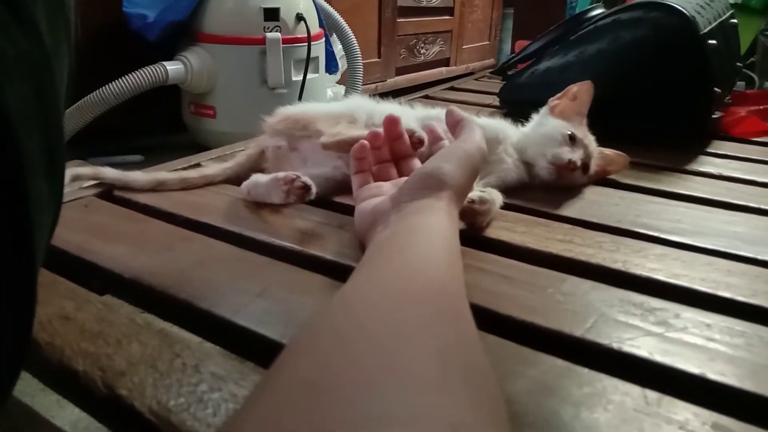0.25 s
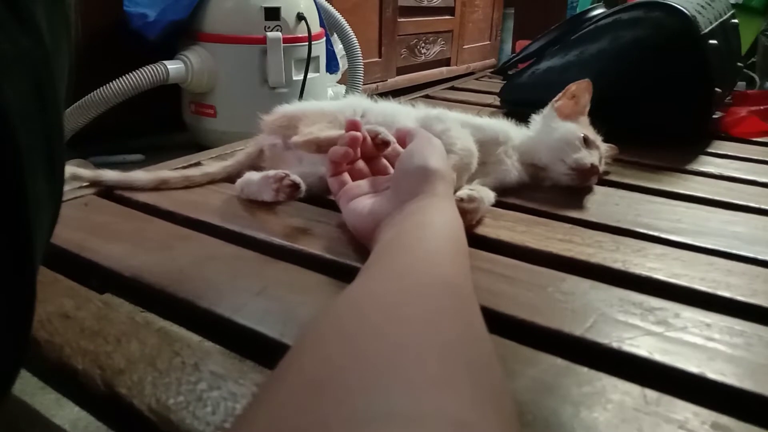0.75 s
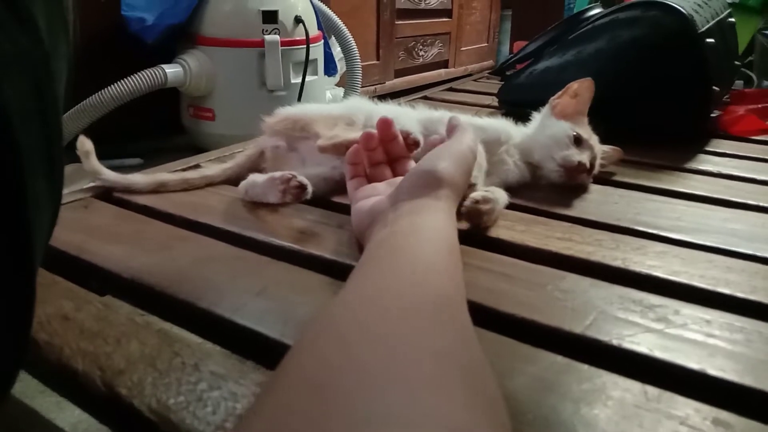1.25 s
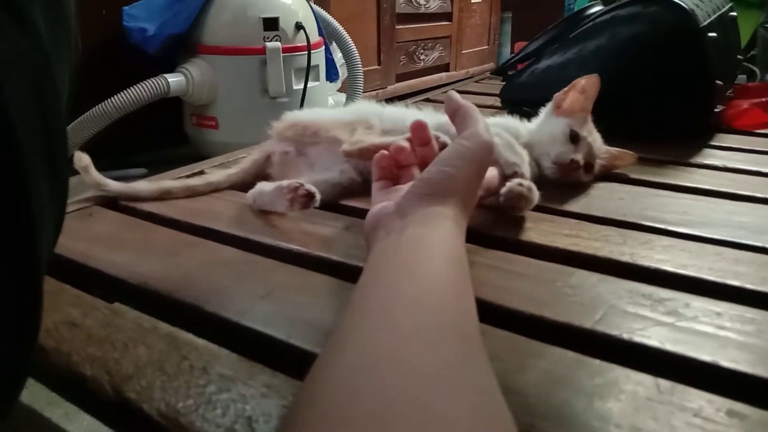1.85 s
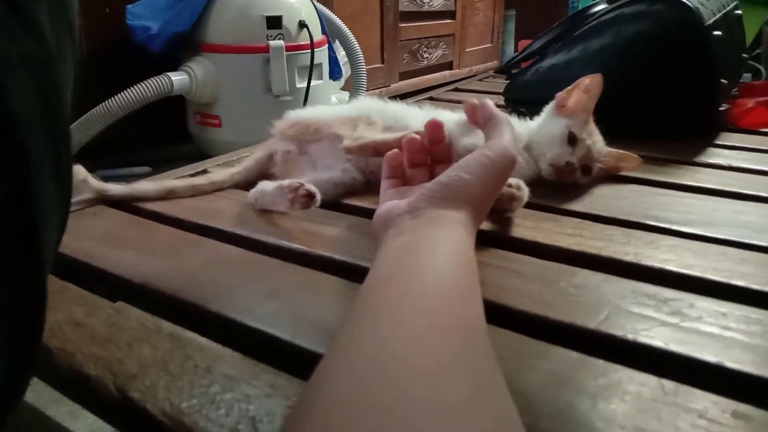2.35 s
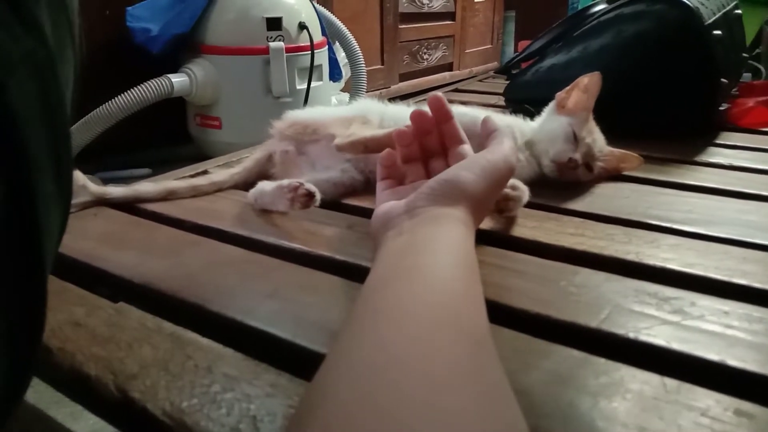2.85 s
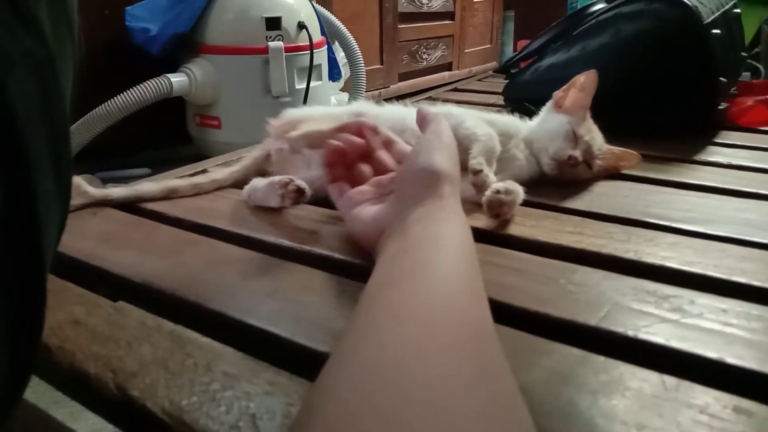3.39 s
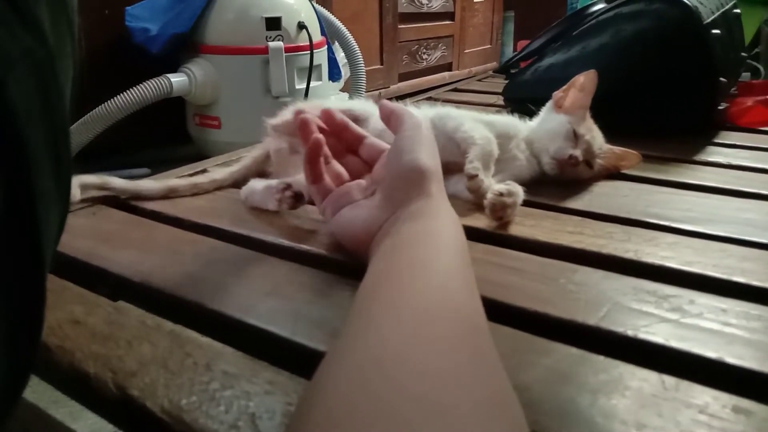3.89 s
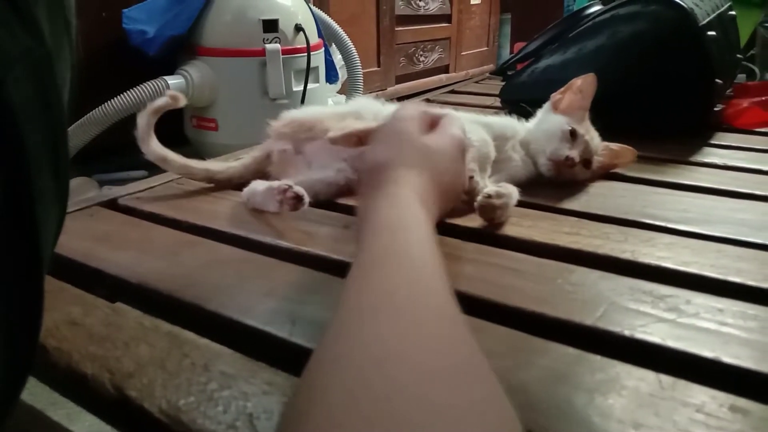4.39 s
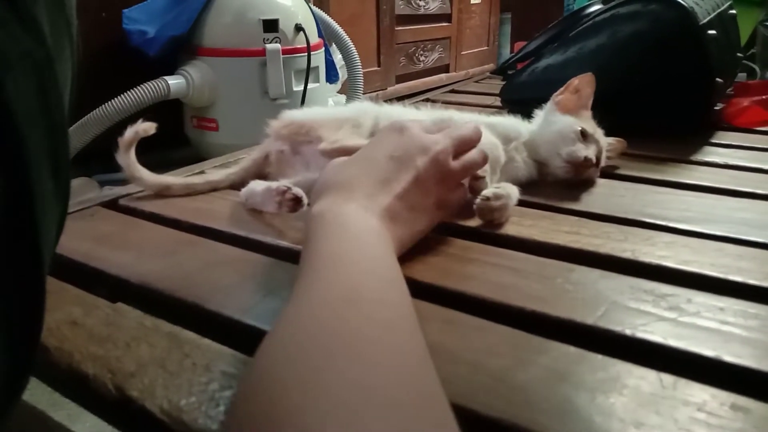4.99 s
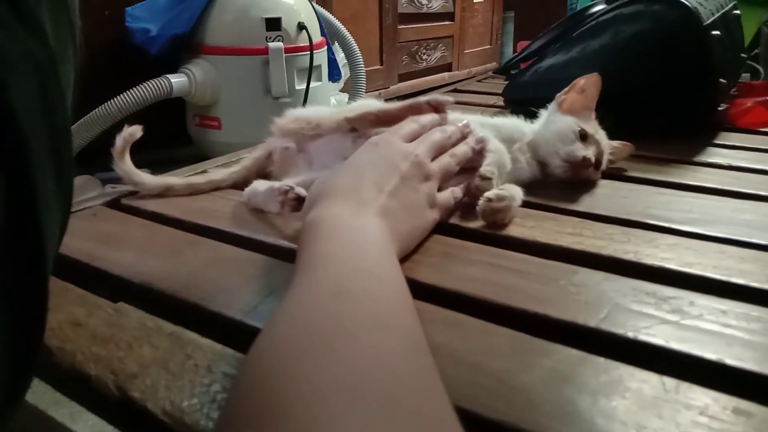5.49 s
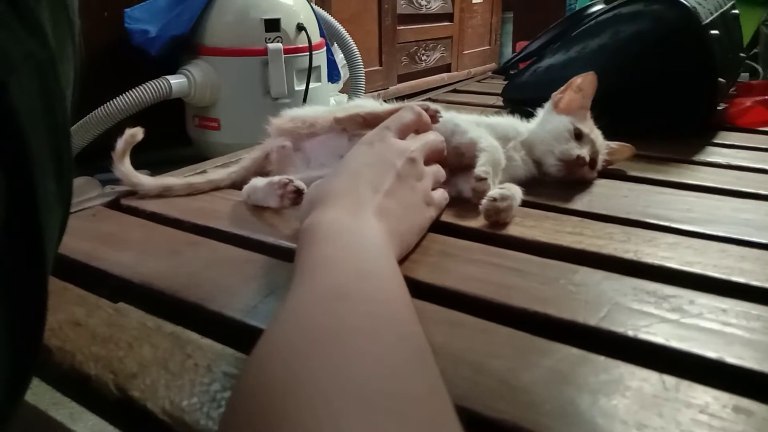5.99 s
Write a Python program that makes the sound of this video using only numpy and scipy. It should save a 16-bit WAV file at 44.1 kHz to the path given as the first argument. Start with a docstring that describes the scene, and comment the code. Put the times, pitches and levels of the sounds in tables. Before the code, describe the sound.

In a walled yard, a rooster crows once close by, raspy at first and ending on a held note that droops and breaks up. Dull, quiet rubs of an arm shifting on a wooden bench follow. Then a distant bird answers very faintly and a second, rougher rooster begins its call. A low pulsing hum and a light wash of open air continue throughout.

```python
"""A yard, heard from beside the porch. From the start a low hum throbs over the outdoor air.
At 1.8 s the near rooster crows: three hoarse syllables, its syrinx swinging between chaotic flapping
and a locked tone, then a long clear note that sags and breaks up. The walls echo each call.
An arm shifts softly on a wooden bench, most around 3.7 s. At 5.4 s a faint crow answers from far off,
and at 5.8 s a second, hoarser rooster starts up, rough puffs ringing its throat."""
import sys
import numpy as np
from scipy import signal
from scipy.fft import rfft, irfft, next_fast_len
from scipy.io import wavfile
from scipy.ndimage import uniform_filter1d, map_coordinates

SR = 44100
rng = np.random.default_rng(int(sys.argv[2]) if len(sys.argv) > 2 else 0)


def store_pcm(level_fs):
    """Save levels as 16-bit WAV."""
    pcm = np.round(np.clip(level_fs, -1, 1) * 32767).astype(np.int16)
    wavfile.write(sys.argv[1], SR, np.atleast_2d(pcm).T)


N = 275184

# The near rooster's crow: (start [s], end [s], pitch [Hz], scoop from below [Hz], sag by the end [Hz],
# jitter [share], roughness [0-1], then relative levels: tone [dB], rasp opening [dB], rasp held [dB],
# rasp closing [dB])
CROW_SYLLABLES = [(1.787, 1.965, 912.4, 84, 4.2, 0.0162, 0.13, -48.5, -55, -44, -47),
                  (2.058, 2.185, 954, 20, 2.1, 0.0073, 0.36, -50.5, -50.5, -48, -45.5),
                  (2.257, 2.649, 940.4, 2.7, 42, .007, 0.2, -48, -42.5, -53.5, -43.5),
                  (2.864, 3.306, 849.3, 2.2, 31, 0.0041, 0.04, -41.5, -50.5, -72.5, -48)]
# Overtones of the first syllable: (multiple of the pitch [ratio], relative level [dB])
SHRILL_OVERTONES = [(1, 2.5), (2, 2.5), (3, -24), (4, -12), (5, -32.5), (7, -31), (7.5, -29), (8, -30)]
# The two middle syllables, beak wide: (multiple of the pitch [ratio], relative level [dB])
WIDE_BEAK_OVERTONES = [(1, 2.5), (2, 0.5), (3, -14), (4, -13), (5, -20.5), (6, -26.5), (8, -31), (9, -33.5)]
# The long note, beak half closed: (multiple of the pitch [ratio], relative level [dB])
NARROW_BEAK_OVERTONES = [(.5, -34), (1, -2.5), (1.5, -11), (2, 0), (2.5, -24), (3, -19), (4, -13.5),
                         (4.5, -46), (5, -38), (6, -50.5), (7, -41), (8, -34), (8.5, -43), (9, -46)]
# Base levels of the long note's partials up to twice its pitch:
# (time [s], partials below the second harmonic [dB], second harmonic [dB])
LONG_NOTE_LOW_LEVELS = [(2.9, -43.5, -44), (2.948, -33, -54), (3.014, -33, -38.5), (3.092, -33, -40.5),
                        (3.126, -30.5, -45.5), (3.166, -35.5, -30), (3.206, -54, -41.5),
                        (3.274, -39.5, -36), (3.36, -47, -51)]


def near_rooster():
    """In the yard, a syrinx swings between chaotic flapping and a locked tone, steadiest at the end."""
    first, second, third, last = CROW_SYLLABLES
    hoarse = rasp()
    short_notes = tone(first, SHRILL_OVERTONES)
    short_notes += tone(second, WIDE_BEAK_OVERTONES[:-2])  # the shortest lacks the top overtones
    short_notes += tone(third, WIDE_BEAK_OVERTONES)
    long_note = tone(last, NARROW_BEAK_OVERTONES, brightest=1.0, low_db=curves(LONG_NOTE_LOW_LEVELS))
    reflected = wall_echo(amp(-4.0) * hoarse + amp(-6.5) * short_notes)
    # the long note's overtones linger on the walls more than its fundamental
    long_reflected = wall_echo(coloured(long_note, [(900, -17), (1600, -9)]))
    return hoarse + short_notes + long_note + reflected + long_reflected


def tone(syllable, overtones, brightest=0.61, low_db=None):
    """The locked syrinx scoops up to pitch and sags as the air runs out.
    It is shrillest at the share `brightest` of the syllable's length."""
    start, end, hz, scoop_hz, sag_hz, jitter, rough, level_db = syllable[:8]
    scoop_s, attack_s, release_s = .05, .036, .02
    dull_db, swell_db = 3.5, 2.5  # overtones sink away from peak effort; each also swells on its own
    age = np.clip(np.arange(N) / SR - start, 0, end - start + 2 * release_s)
    progress = age / (end - start)
    pitch = hz - scoop_hz * np.exp(-age / scoop_s) - sag_hz * progress ** 2
    phase = 2 * np.pi * np.cumsum(pitch * (1 + jitter * wobble(180))) / SR
    voice = np.zeros(N)
    for multiple, db in overtones:  # half multiples arise when every other cycle is stronger
        base_db = level_db - dull_db * multiple * (progress - brightest) ** 2 + swell_db * wobble(20)
        if low_db and multiple <= 2:
            base_db = low_db[int(multiple == 2)]
        voice += amp(base_db + db + rough * 16.6 * wobble(55)) * np.sin(multiple * phase)
    # fast swings of strength put a rough skirt round every overtone
    flutter = (1 + rough * wobble(300)) * amp(3 * rough * wobble(40))
    return np.sqrt(2) * voice * flutter * envelope(start, end, attack_s, release_s)


# The near rooster's throat response: (frequency [Hz], gain [dB])
THROAT_RESPONSE = [(290, -50), (500, -18.5), (611, -15.5), (719, -2.5), (901, -6), (1030, -9), (1200, 5.5),
                   (1380, -2), (1710, -0.5), (2040, -23), (2550, -35), (3580, -34), (4320, -55.5),
                   (6610, -66), (10000, -62), (13000, -102.5), (22000, -120)]


def rasp():
    """Uneven puffs ring the throat, most as pressure builds and as it drops; the closing is chestier."""
    flap_hz, opening_s, closing_s = 883, .058, .045
    attack_s, release_s = .04, .025
    chest_db, closing_chest_db, edge_db = -5.5, 1, -14.5  # against the middle band
    sounding, closing = np.zeros(N), np.zeros(N)
    for start, end, *_, open_db, held_db, close_db in CROW_SYLLABLES:
        sounding += amp(open_db) * envelope(start, start + opening_s, attack_s, release_s)
        sounding += amp(held_db) * envelope(start + opening_s / 4, end, opening_s, release_s)
        closing += amp(close_db) * envelope(end - closing_s, end + closing_s, attack_s, release_s)
    flaps = coloured(membrane_puffs(flap_hz, jitter=.15, scatter_db=5.5), THROAT_RESPONSE)
    chest = np.hypot(amp(chest_db) * sounding, amp(closing_chest_db) * closing) * band(flaps, 600, 907)
    middle = band(flaps, 1015, 2470)
    edge = amp(edge_db) * band(flaps, 2150, 7000)
    return (chest + np.hypot(sounding, closing) * (middle + edge)) * amp(2.2 * wobble(50))


def membrane_puffs(flap_hz, jitter, scatter_db):
    """Puffs of a membrane that flaps unevenly in period and strength."""
    cycles = np.cumsum(flap_hz * np.exp(jitter * wobble(500))) / SR
    at = np.interp(np.arange(1, cycles[-1]), cycles, np.arange(N))
    strength = amp(scatter_db * rng.standard_normal(len(at)))
    taps = at.astype(int)[:, None] + np.arange(-7, 9)
    offset = taps - at[:, None]
    shape = np.sinc(offset) * np.cos(np.pi * offset / 16) ** 2  # lets a puff fall between samples
    return np.bincount(np.clip(taps, 0, N).ravel(), (strength[:, None] * shape).ravel(), N + 1)[:N]


# The second rooster's syllables:
# (start [s], end [s], then relative levels: middle [dB], chest [dB], edge [dB], whistle [dB])
RIVAL_SYLLABLES = [(5.766, 5.939, -43.5, -49.5, -76.5, -69), (5.956, 6.121, -48, -48, -63.5, -70),
                   (6.139, 6.254, -44.5, -44, -60, -65.5)]
# Its throat resonances in the first syllable: (frequency [Hz], width [Hz], gain [dB])
RIVAL_START_MODES = [(740, 135, 2), (1190, 170, 1), (1367, 140, -1.5), (1570, 140, -4), (1805, 360, -10.5),
                     (3860, 250, -15.5), (5700, 270, -29.5), (6400, 98, -22), (6760, 120, -20.5),
                     (7500, 120, -31)]
# The same with the beak open: (frequency [Hz], width [Hz], gain [dB])
RIVAL_OPEN_MODES = [(759, 75, 4), (898, 67, -6), (1108, 99, 4), (1282, 135, 5), (1533, 94, 0),
                    (1775, 125, 2), (2130, 83, -9.5), (2425, 63, -18), (2703, 81, -21), (3440, 280, -23),
                    (5470, 330, -21), (5840, 120, -20), (6700, 260, -34.5), (7270, 170, -30)]


def rival_rooster():
    """The second rooster flaps roughly through narrow throat resonances that shift as its beak opens."""
    bands_hz = [(1000, 2020), (520, 1045), (2010, 4200), (5270, 7900)]  # middle, chest, edge, whistle
    attacks_s = (0.069, 0.13, 0.055, 0.043)  # the chest speaks last
    opened, = curves([(5.91, 0.027), (5.98, 0.87)])
    puffs = membrane_puffs(flap_hz=442, jitter=.09, scatter_db=3.5)
    flaps = (1 - opened) * filtered(puffs, resonances(RIVAL_START_MODES, order=2))
    flaps += opened * filtered(puffs, resonances(RIVAL_OPEN_MODES, order=2))
    parts = [band(flaps, low, high) for low, high in bands_hz]
    voice = np.zeros(N)
    for start, end, *levels_db in RIVAL_SYLLABLES:
        for part, db, attack_s in zip(parts, levels_db, attacks_s):
            voice += amp(db) * part * envelope(start, end, attack_s, release_s=.04)
    voice *= amp(0.84 * wobble(37))
    return amp(0.5) * voice + amp(-9.5) * wall_echo(voice)


# Brief tones from the other side of each rooster's syrinx, plus the second rooster's own pitch from 5.99 s: #
# (start [s], end [s], start pitch [Hz], end pitch [Hz], relative level [dB])
SYRINX_GLIDES = [(1.796, 1.874, 644, 788, -48.5), (1.937, 2.061, 1252, 1215, -48),
                 (1.953, 2.004, 1663, 1640, -46.5), (2.283, 2.358, 1695, 1680, -44),
                 (2.743, 2.901, 1150, 1126, -48.5), (5.787, 5.824, 1800, 1730, -51),
                 (5.809, 5.89, 1293, 1345, -43), (5.885, 5.956, 709, 769, -48),
                 (5.99, 6.226, 886, 907, -51), (6.082, 6.19, 2307, 2285, -60),
                 (6.15, 6.249, 1240, 1270, -43), (6.17, 6.24, 3390, 3405, -62.5)]


def side_tones():
    """The two halves of a syrinx can sing apart: short unsteady glides ride on the rasp; one glide carries the
    second rooster's own pitch."""
    voice = np.zeros(N)
    for start, end, start_hz, end_hz, db in SYRINX_GLIDES:
        glide = [(start, start_hz), (end, end_hz)]
        pitch = curves(glide)[0] * (1 + 0.0082 * wobble(160))
        phase = 2 * np.pi * np.cumsum(pitch) / SR
        voice += amp(db + 2.0 + 2.6 * wobble(50)) * np.sin(phase) * gate(glide, fade_s=.027)
    return voice + amp(-11.5) * wall_echo(voice)


# The answer from far off: (time [s], frequency [Hz])
FAR_CROW_GLIDE = [(5.44, 1650), (5.6, 1635)]


def far_crow():
    """Only the strongest partial of a distant bird carries to the microphone."""
    pitch, = curves(FAR_CROW_GLIDE)
    phase = 2 * np.pi * np.cumsum(pitch * (1 + 0.0088 * wobble(120))) / SR
    call = amp(-56) * np.sin(phase) * gate(FAR_CROW_GLIDE, fade_s=.02)
    return call + amp(-15.0) * wall_echo(call)


# Reverberation between the walls of the yard: (frequency [Hz], time to fall 60 dB [s])
WALL_DECAY = [(200, 0.3), (1000, 0.82), (3000, 0.67), (9000, 0.17)]


def wall_echo(x):
    """The walls' answer reaches the microphone 8 ms late; each frequency dies at its own speed."""
    hz, t, spectrum = signal.stft(rng.standard_normal(SR), SR, nperseg=256)
    decay = amp(-60 * t / along(WALL_DECAY, hz)[:, None])
    tail = signal.istft(spectrum * decay, SR, nperseg=256)[1]
    delayed = np.pad(tail / np.linalg.norm(tail), (round(.008 * SR), 0))
    return signal.fftconvolve(x, delayed)[:N]


# Soft hollow rubs on the bench: (time [s], length [s], frequency [Hz], width [Hz], level [dB])
BENCH_RUBS = [(0.06, 0.15, 505, 50, -54.5), (0.379, 0.22, 572, 72.3, -57.5), (0.47, 0.086, 313, 117.4, -58),
              (2.226, 0.1, 480, 40, -50.5), (2.631, 0.18, 299.4, 34.8, -50), (2.805, 0.071, 335, 60, -49.5),
              (3.277, 0.13, 334, 72.3, -46), (3.458, 0.14, 295.8, 44, -49.5),
              (3.688, 0.077, 257.8, 168, -44.5), (3.749, 0.091, 520, 130, -50.5),
              (3.856, 0.135, 334.8, 70.7, -46.5), (3.979, 0.092, 251, 40.3, -48.5),
              (3.967, 0.14, 811, 49.5, -56.5), (4.481, .14, 458, 71, -56.5),
              (4.854, 0.076, 615, 35.5, -56.5), (5.332, 0.095, 410, 138.5, -52)]


def bench_rubs():
    """Each rub of the arm on the wood is a short swell of noise in one hollow resonance."""
    out = np.zeros(N)
    t = np.arange(N) / SR
    for time, length, hz, width_hz, db in BENCH_RUBS:
        near = np.abs(t - time) < 2 * length
        from_peak = t[near] - time
        knots = rng.standard_normal((2, 400))
        position = (from_peak + 2 * length) * width_hz
        cos_gain, sin_gain = [map_coordinates(k, [position], mode="wrap") for k in knots]
        phase = 2 * np.pi * hz * t[near]
        swell = amp(db) * np.exp(-2 * (from_peak / length) ** 2)
        out[near] += swell * (cos_gain * np.cos(phase) + sin_gain * np.sin(phase))
    return out


# Dull colour of the sliding arm, also of the yard's low-middle air: (frequency [Hz], density [dB])
DULL_SPECTRUM = [(90, -21), (170, 0), (240, 0), (330, -0.5), (420, -4.5), (520, -6.5), (700, -15.5),
                 (1000, -23), (1600, -32.5), (4000, -70)]


def arm_slide():
    """One dull swell of noise as the arm slides over the bench."""
    peak_s, length_s, level_db = 3.74, .17, -47
    swell = np.exp(-((np.arange(N) / SR - peak_s) / length_s) ** 2)
    return amp(level_db + 2.7 * wobble(25)) * swell * noise(DULL_SPECTRUM)


# Slow swell of the hum and its rumble at the microphone: (time [s], relative level [dB])
HUM_SWELL = [(0.0, -31.5), (0.48, -40), (0.78, -34.5), (1.06, -42.5), (1.56, -34.5), (2.04, -39.5),
             (2.54, -34), (3.24, -36), (4.36, -44), (4.64, -38.0), (5.48, -45), (5.64, -38.5), (6.22, -41)]
# The hum's low resonances: (frequency [Hz], width [Hz], gain [dB])
HUM_RESONANCES = [(94.2, 10.5, -6.5), (112.4, 8.3, -1.5), (132.4, 13.4, -5)]
# Colour of the rumble under the hum and across the yard: (frequency [Hz], density [dB])
RUMBLE_SPECTRUM = [(20, -23.5), (40, 5), (60, 9.5), (80, 21.5), (100, 8.5), (150, 12.5), (200, 6.5),
                   (300, -49.5)]


def hum():
    """Closely spaced resonances beat over a broad rumble; both throb unevenly on a slow swell."""
    throb_hz, throb_depth, throb_wander = 6.4, .5, .45
    drone_db, rumble_db = -1, -9  # against the swell
    swell_db, = curves(HUM_SWELL)
    ringing = filtered(rng.standard_normal(N), resonances(HUM_RESONANCES))
    drone = signal.hilbert(band(ringing, 63, 137))
    evened = unit(drone.real / (np.abs(drone) + 0.11) ** 0.15)  # slightly shallower beats
    turns = np.cumsum(throb_hz * (1 + throb_wander * wobble(8))) / SR
    throb = unit(1 + throb_depth * np.sin(2 * np.pi * turns))
    return amp(swell_db) * throb * (amp(drone_db) * evened + amp(rumble_db) * noise(RUMBLE_SPECTRUM))


# Slow drift of the outdoor air: (time [s], distant noise level [dB], low-middle level [dB])
AIR_DRIFT = [(0, -52.5, -53), (1.2, -54, -57.5), (3.4, -51, -50.5), (6.24, -51, -54.5)]
# Colour of the noise that reaches the yard from afar: (frequency [Hz], density [dB])
DISTANT_SPECTRUM = [(200, -25), (600, -17), (800, -11.5), (1020, -7.5), (1180, -4.5), (1270, 4.5),
                    (1400, -9.5), (1700, -18.5), (2200, -30), (3400, -34.5), (4400, -40), (5600, -37),
                    (8000, -57), (12000, -84)]


def yard_air():
    """Open air around the microphone: steady rumble, a dull wash and a band of distant noise."""
    distant_db, wash_db = curves(AIR_DRIFT)
    rumble = amp(-54.5) * noise(RUMBLE_SPECTRUM)
    wash = amp(wash_db + wobble(13)) * patchy(noise(DULL_SPECTRUM), depth_db=3.0)
    distant_db += 0.56 * wobble(6.6) + 0.29 * wobble(16)
    return rumble + wash + amp(distant_db) * patchy(noise(DISTANT_SPECTRUM), depth_db=3.0)


def patchy(x, depth_db):
    """Random patches of gain in time and pitch, as many far sounds come and go."""
    spectrum = signal.stft(x, nperseg=2048)[2]
    patches = uniform_filter1d(rng.standard_normal(spectrum.shape), size=4, axis=0)
    patches = uniform_filter1d(patches, size=5, axis=1)
    return unit(signal.istft(spectrum * amp(depth_db * unit(patches)), nperseg=2048)[1][:N])


# Colour of the faint hiss behind everything: (frequency [Hz], density [dB])
HISS_SPECTRUM = [(1000, 7), (7000, 3.5), (10000, 0.5), (13700, 1), (15000, 2)]


def hiss(level_db):
    """A steady, nearly white noise floor."""
    return amp(level_db) * noise(HISS_SPECTRUM)


def amp(db):
    """Decibels to gain."""
    return 10 ** (np.asarray(db) / 20)


def unit(x):
    """Scale to rms 1."""
    return x / np.sqrt(np.mean(x ** 2) + 1e-20)


def along(points, hz):
    """Interpolate (frequency, value) points on a log axis."""
    f, values = np.transpose(points)
    return np.interp(np.log(hz + 1), np.log(f + 1), values)


def curves(rows):
    """One value per sample for each column after the time."""
    times, *columns = np.transpose(rows)
    return [np.interp(np.arange(N) / SR, times, column) for column in columns]


def envelope(start, end, attack_s, release_s):
    """Rise, hold until the end, die away."""
    t = np.arange(N) / SR
    return np.clip((t - start) / attack_s, 0, 1) ** 2 * np.exp(-np.maximum(t - end, 0) / release_s)


def gate(rows, fade_s):
    """Open from the first row to the last, with soft edges."""
    t = np.arange(N) / SR
    return np.clip(np.minimum(t - rows[0][0], rows[-1][0] - t) / fade_s + 1, 0, 1) ** 2


def wobble(rate):
    """A smooth random curve, rate knots a second."""
    return map_coordinates(rng.standard_normal(int(N * rate / SR) + 4), [np.arange(N) * rate / SR])


def filtered(x, response):
    """x through a response given as a function of frequency."""
    size = next_fast_len(N + SR // 2)
    return irfft(rfft(x, size) * response(np.fft.rfftfreq(size, 1 / SR)), size)[..., :N]


def coloured(x, spectrum):
    """x shaped by (frequency [Hz], gain [dB]) points."""
    return filtered(x, lambda f: amp(along(spectrum, f)))


def resonances(modes, order=1):
    """Causal response of a set of modes; a higher order deepens the valleys."""
    return lambda f: sum(
        (-1) ** k * amp(db) * (1j * f * width / (hz * hz - f * f + 1j * f * width)) ** order
        for k, (hz, width, db) in enumerate(modes))


def noise(spectrum):
    """Noise of rms 1 with a given colour."""
    return unit(coloured(rng.standard_normal(N), spectrum))


def band(x, low_hz, high_hz):
    """One steep band of x at rms 1."""
    return unit(filtered(x, lambda f: 1 / (1 + (low_hz / (f + 1)) ** 16) / (1 + (f / high_hz) ** 16)))


def scene():
    """At the microphone both channels hear alike; only a trace of rumble and the faint hiss differ."""
    birds = near_rooster() + rival_rooster() + side_tones() + far_crow()
    centre = birds + hum() + yard_air() + bench_rubs() + arm_slide() + hiss(-79.5)
    side = hiss(-80.0) + amp(-91.5) * noise(RUMBLE_SPECTRUM)
    return np.array([centre + side, centre - side])


def record(dry):
    """The recorder keeps nothing above 15.5 kHz."""
    return filtered(dry, lambda hz: hz < 15500)


dry = scene()
out = record(dry)
store_pcm(out)
```